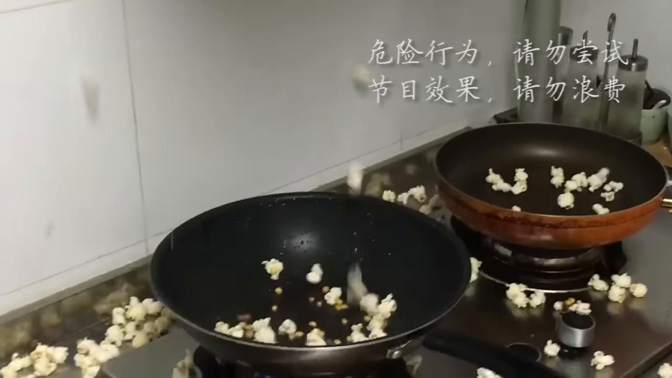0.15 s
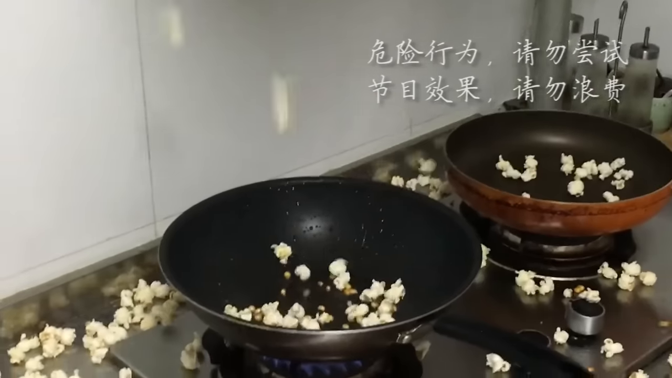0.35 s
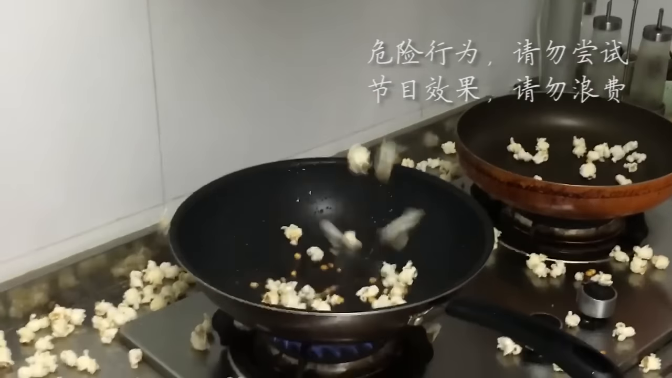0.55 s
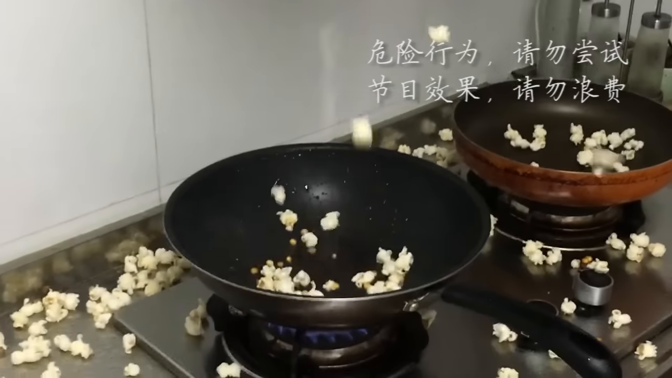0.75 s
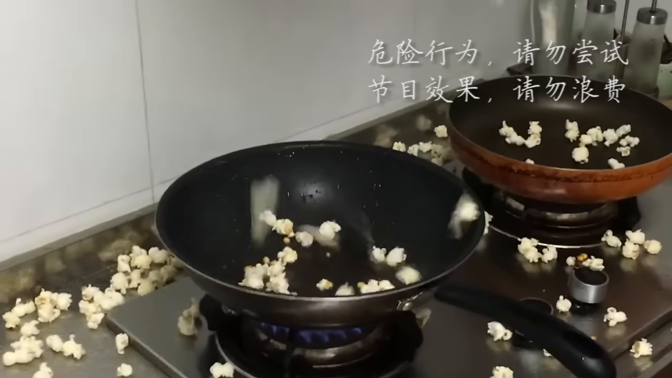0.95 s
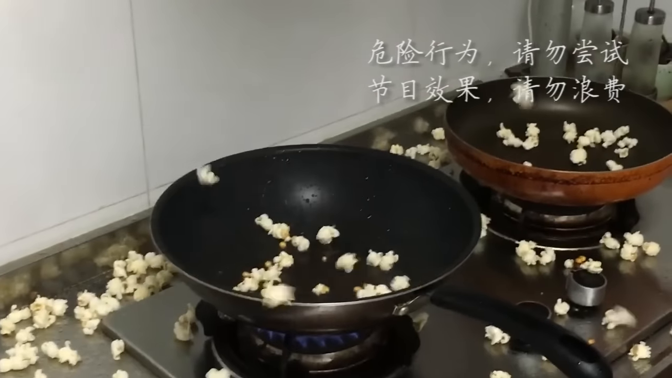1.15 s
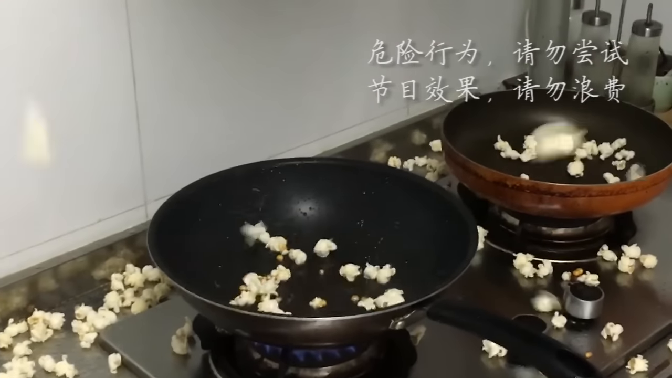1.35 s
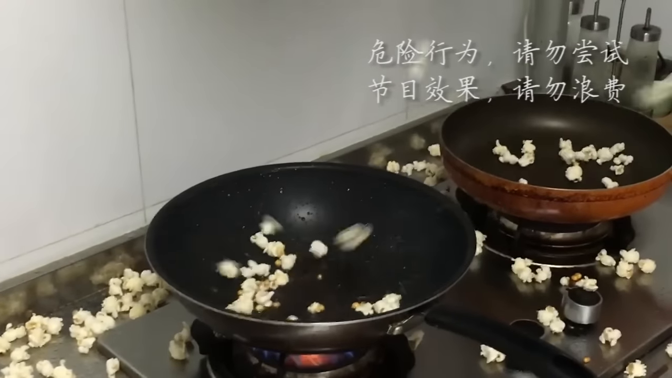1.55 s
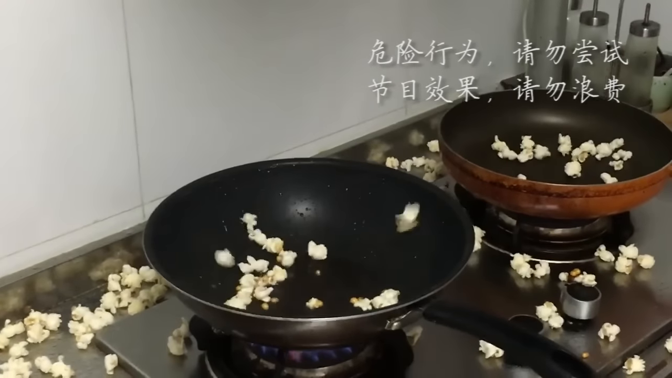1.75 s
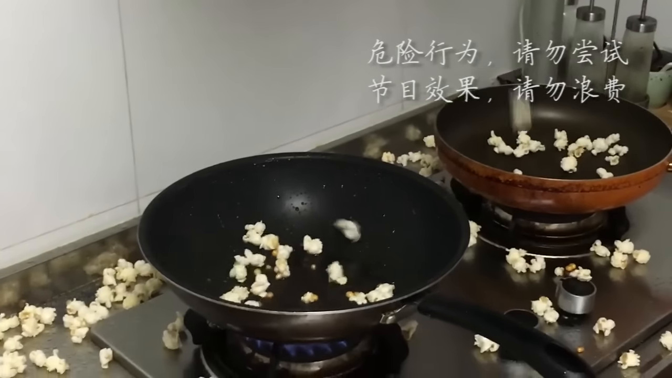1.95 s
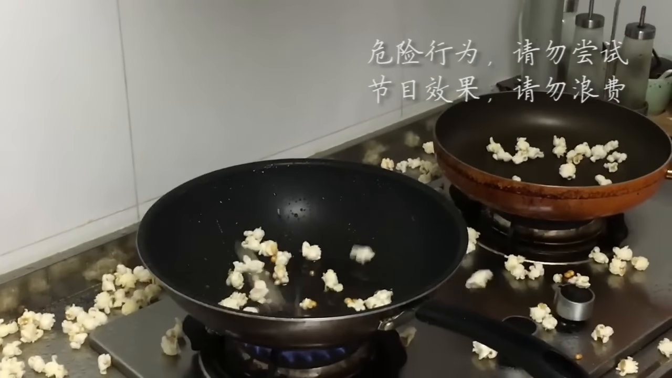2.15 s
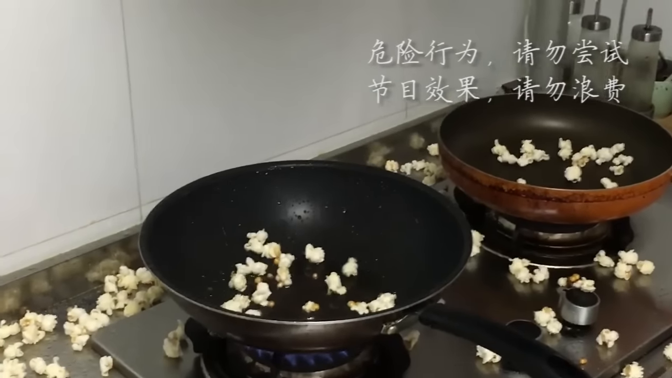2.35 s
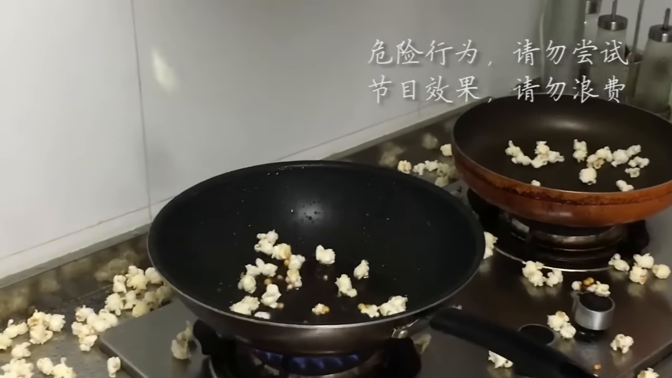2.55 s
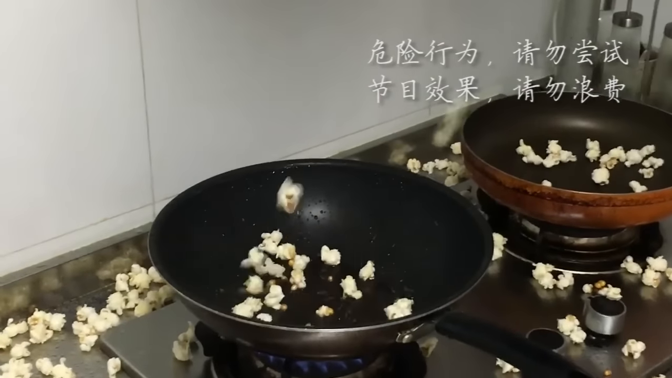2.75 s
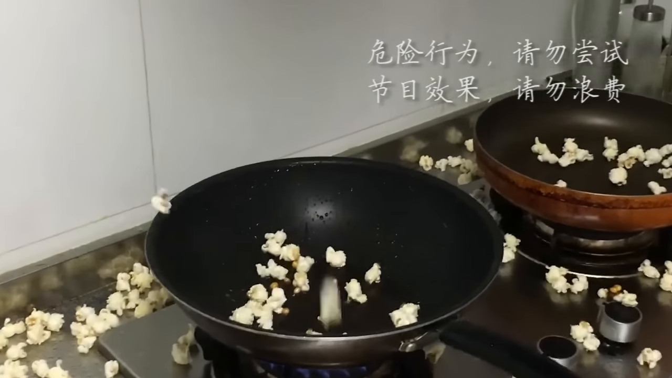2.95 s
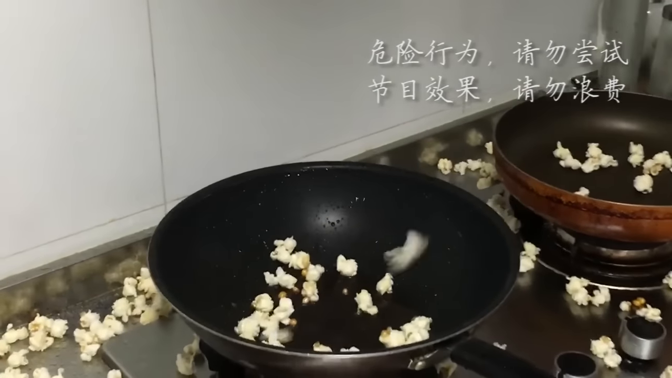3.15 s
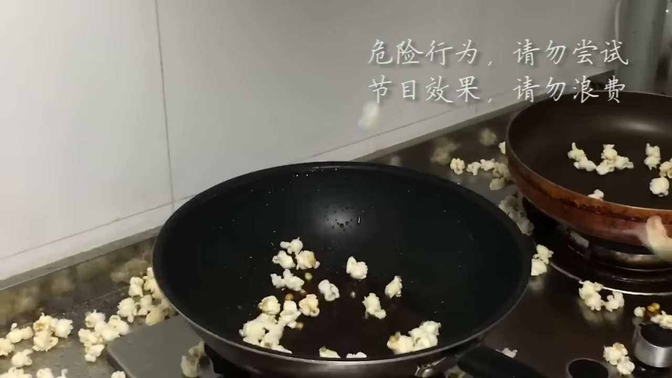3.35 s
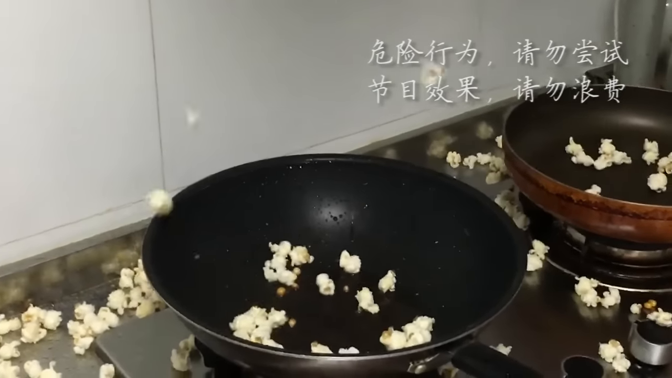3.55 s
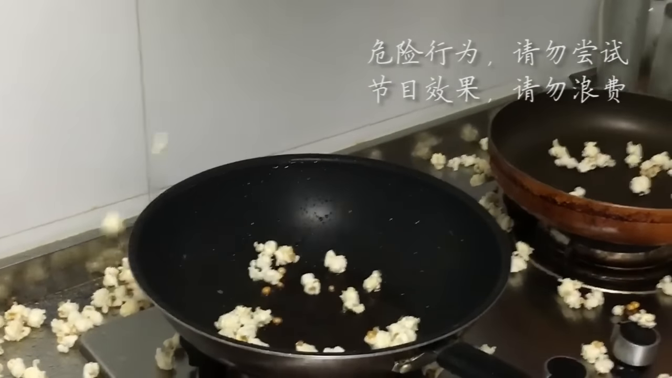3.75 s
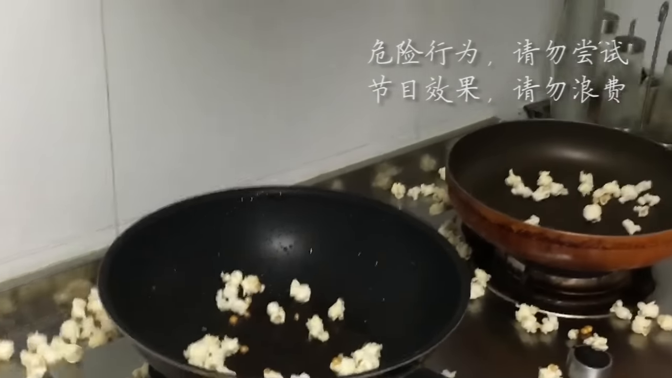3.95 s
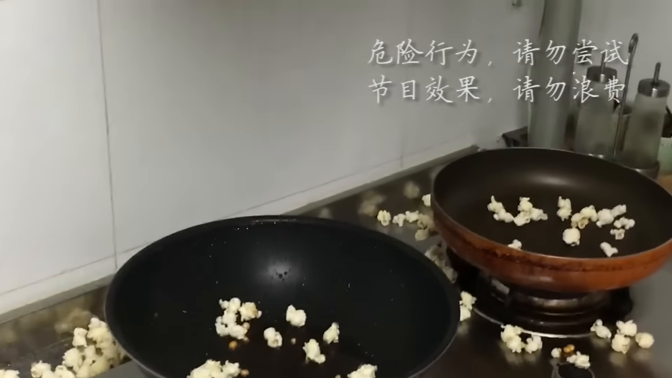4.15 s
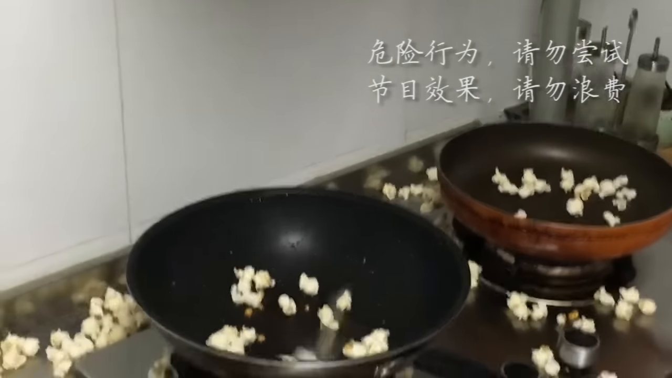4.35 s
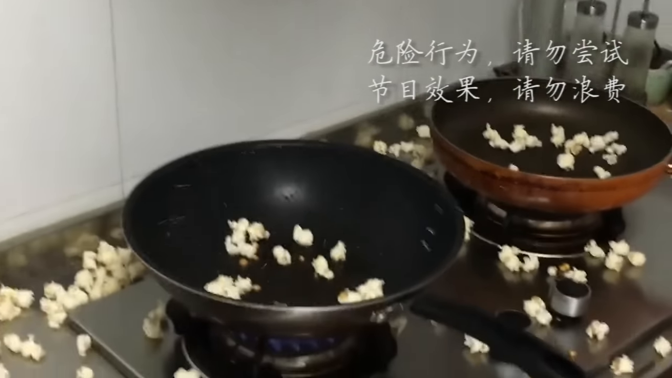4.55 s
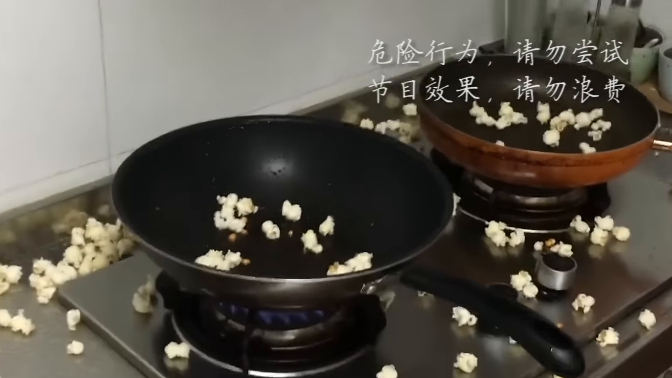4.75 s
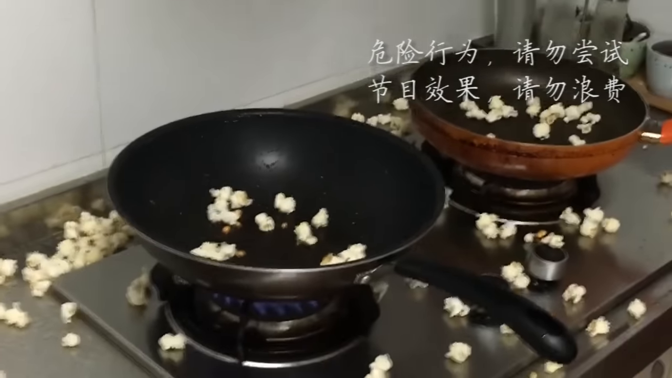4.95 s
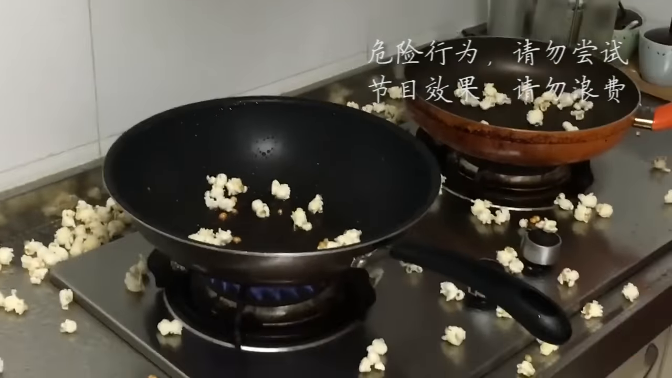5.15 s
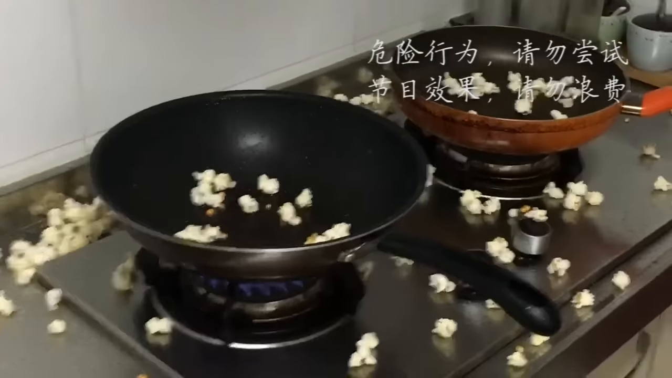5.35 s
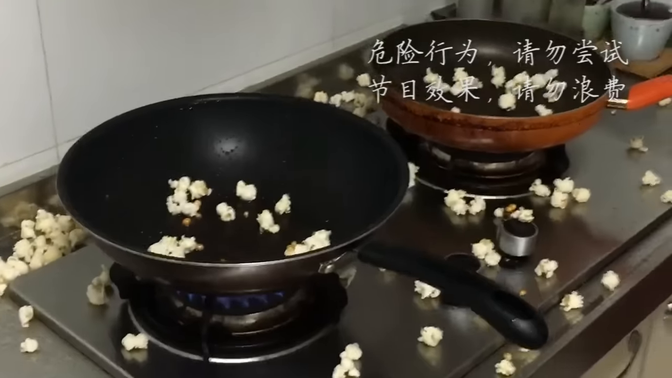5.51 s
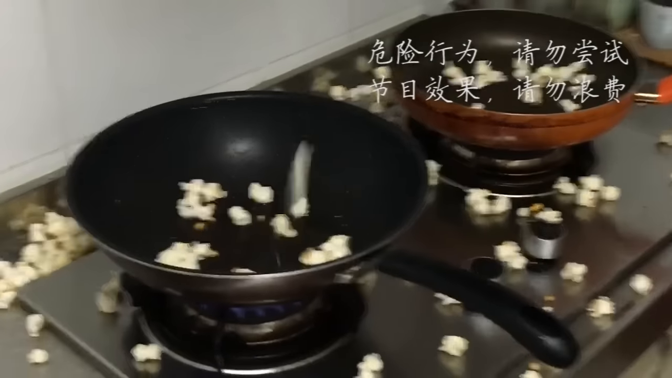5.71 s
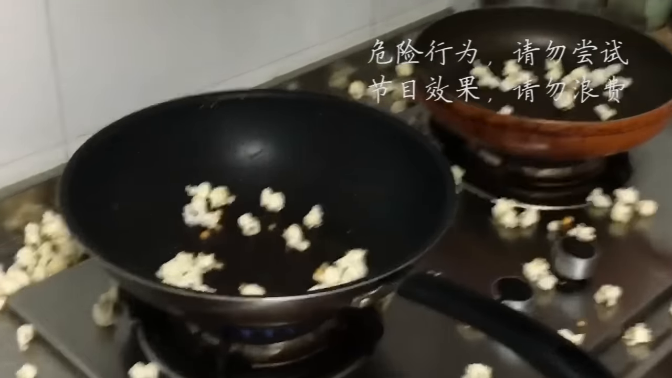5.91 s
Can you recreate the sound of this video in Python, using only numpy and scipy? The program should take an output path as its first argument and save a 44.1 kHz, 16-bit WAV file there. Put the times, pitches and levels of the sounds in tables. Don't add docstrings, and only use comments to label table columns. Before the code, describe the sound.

Popcorn kernels burst with sharp, ringing cracks in an open wok over a hissing gas flame, flakes thudding onto a steel stovetop in a kitchen.

```python
import sys
import numpy as np
from scipy import signal
from scipy.fft import rfft, irfft, next_fast_len
from scipy.io import wavfile
from scipy.ndimage import uniform_filter1d

SR = 44100
rng = np.random.default_rng(int(sys.argv[2]) if len(sys.argv) > 2 else 0)


def undo_db(level):
    steps = np.asarray(level, float) / 20
    return 10 ** steps


def bounce(signal):
    frames = np.transpose(np.atleast_2d(signal))
    limited = np.clip(frames, -1, 1)
    pcm = np.round(limited * 32767).astype(np.int16)
    wavfile.write(sys.argv[1], SR, pcm)


N = 268116
SPAN, SHORT = 20480, 2048
HZ = np.fft.rfftfreq(SPAN, 1 / SR)
HZ_SHORT = HZ[::SPAN // SHORT]

# frequency in Hz, level in dB per Hz.
FLAME_COLOUR = [(18, -37), (30, 2), (112, 2), (195, -7), (323, 1), (479, -6.5), (608, -3), (771, -8),
                (952, -1), (1660, -6), (5020, -14.5), (6200, -9.5), (7460, -14), (15200, -14.5),
                (16500, -40)]
# frequency in Hz, width in Hz, height in dB.
BURNER_WHISTLES = [(6280, 110, 10), (6090, 260, 7), (1050, 200, 1.5), (2300, 350, 4)]
# time in seconds, level in dB, rumble below 1 kHz in dB.
FLAME_LEVEL = [
    (0, -41, 4),
    (1.4, -37, 0.5),
    (2.0, -39, -0.5),
    (2.7, -40.5, 1),
    (3.8, -40.5, 0),
    (4.3, -42.5, -3.5),
    (4.9, -42.5, -3),
    (5.4, -44, -1),
    (6.08, -42, -4.5),
]
# frequency in Hz, width in Hz, height in dB.
MIC_PORT = [(10470, 620, -1)]

# frequency in Hz, time to fall 60 dB in seconds.
ROOM_DECAY = [(60, 0.43), (250, 0.39), (700, 0.45), (1800, 0.43), (4800, 0.41), (9000, 0.39), (14000, 0.27)]
# delay in milliseconds, level in dB.
ECHOES = [(0, 7.5), (1.6, 0), (4.8, 0.5), (7.5, -6.5)]

# start in seconds, level in dB, centre in Hz, sharpness.
THUDS = [(0.224, -14.5, 1720, 0.49), (0.344, -15.5, 1390, 0.52), (0.449, -19, 1810, 0.86),
         (1.279, -19.5, 930, 0.52), (2.147, -22, 1150, 0.73), (2.5637, -20.5, 1030, 0.6),
         (2.719, -33, 1104, 0.31), (3.3, -28, 1060, 2), (3.905, -18.5, 980, 1.1), (3.9065, -26, 252, 1.3),
         (4.047, -27, 1700, .5), (4.313, -27, 1110, .45), (4.372, -25, 2080, 0.56), (5.174, -31, 980, 2.2),
         (5.181, -39, 230, 1.2), (5.484, -25.5, 1880, 1.6)]
# start in seconds, level in dB, centre in Hz, sharpness.
SKIDS = [
    (0.471, -10.5, 1730, 0.3),
    (4.023, -19.5, 920, 0.53),
    (4.03, -24, 280, 0.91),
    (4.055, -23.5, 1050, 1.4),
    (5.416, -26.5, 2120, 2.6),
    (5.43, -23, 2590, 0.48),
    (5.475, -21, 2350, 0.34),
]
# start in seconds, level in dB, centre in Hz.
TICKS = [
    (0.45, -37, 3100),
    (2.255, -36, 8000),
    (4.229, -34, 6600),
    (4.047, -32, 6000),
    (4.374, -22, 12000),
    (4.3125, -35.5, 2500),
    (4.6, -40, 6410),
    (5.167, -28.5, 10400),
    (5.715, -43, 6170),
    (6.0732, -17, 12000),
]

# start in seconds, peak in dB.
AIR_PUFFS = [(0.483, -38), (0.567, -23), (0.892, -28), (1.003, -21), (1.417, -21.5), (1.659, -20),
             (1.951, -42), (2.345, -20), (2.801, -19.5), (3.612, -31), (3.906, -33), (4.55, -51),
             (5.864, -21)]
# start in seconds, peak in dB, length in milliseconds, gap to the bowl's copy in milliseconds, puff in dB.
SLAPS = [
    (3.0552, 6, .27, 1.6, -5),
    (3.3108, 4, .24, 1.1, -21),
]

# start in seconds, room level in dB, bass weight in dB, treble snap in dB, direct pulse over room in dB.
FLURRY = [(-0.012, 10, -25, -16.5, 12), (0.3126, -22, -37, -9.0, 7), (0.4848, -12, -18.5, -11, 8.5),
          (0.5675, 1.0, -27, -11.5, 10.5), (0.616, -1.5, -18, -15, 7.5), (0.6481, -2.5, -21, -16.5, -1.5),
          (0.7323, -6.5, -16.5, -14.0, 8.5), (0.893, -7, -17.5, -13.5, 8), (0.9613, -4.0, -13, -15, 6),
          (0.9875, -1.5, -21.0, -14.5, 8), (1.0031, -5, -9.5, -33, 7), (1.0901, -2, -19, -19.5, 6.0)]
# start in seconds, room level in dB, bass weight in dB, treble snap in dB, direct pulse over room in dB.
STRAGGLERS = [(1.4158, 2.5, -30.5, -17.0, 3), (1.658, -1, -28, -19, 8.5), (1.6861, 1, -29, -18.0, 8.8),
              (1.952, -5.5, -15, -14, 6.0), (2.345, -7, -17.5, -12, 7.3), (2.809, 1.0, -31.5, -17.5, 8.5),
              (2.8636, -8.0, -13.5, -17.0, 9.9), (3.054, -2.5, -27.5, -12.5, 9),
              (3.31, -7.0, -19, -10, 10.7), (3.4737, 4.5, -31.5, -14.5, 5.3), (3.613, -1.0, -25, -4.5, 5.3),
              (4.559, 1, -24.5, -14.5, 9.1), (5.8633, -8, -18.5, -12.5, 8.5),
              (6.0663, -16.5, -23, 2.5, 2.1)]
# frequency in Hz, level in dB per Hz.
BURST_COLOUR = [(24, -34), (40, -34), (112, -6), (233, -7.5), (271, -1.5), (484, -10.5), (608, -2),
                (672, -8), (909, -14), (1620, -14), (3920, -9.5), (4790, -12.5), (6170, -9.5), (14900, -5),
                (16500, -58)]
# frequency in Hz, width in Hz, height over the broad colour in dB.
BOWL_MODES = [(109.5, 5.4, 5.5), (204, 5, 12.5), (269.4, 8.1, 9), (303, 17, 4.5), (538, 6.4, 8.5),
              (604, 10.6, 10), (633, 22, 4), (797, 12, -4), (1104, 11.4, 9), (1510, 10, 1.5),
              (1658, 20, 5.5), (1886, 56, 2.5), (2320, 11, 6.5), (2340, 14, 6), (4020, 13, -2),
              (4200, 21, 3), (5890, 44, 5), (6530, 38, 2)]
# burst start in seconds, delay in milliseconds, share, second delay in milliseconds, ring in dB.
BOUNCES = [(-0.012, 0.19, 0.079, 0.46, 2.5), (0.485, 0.062, 0.14, 0.95, -8.5),
           (0.568, 0.6, 0.094, 1.34, -2.5), (0.616, 0.606, 0.45, 1.18, 2.5), (0.648, 0.333, 0.4, 0.59, 1.5),
           (0.732, 0.93, 0.46, 0.9, 2.5), (0.893, 0.46, 0.13, 0.83, 4), (1.09, 0.37, 0.093, 0.58, -3),
           (1.417, 0.39, 0.17, 0.97, 9), (1.658, 0.23, 0.31, 1.44, 4.5), (1.686, 0.15, 0.85, 0.53, 1),
           (1.952, 0.13, 0.22, 0.35, -3), (2.345, 0.96, 0.33, 0.58, 2.5), (2.809, 0.33, 0.067, 0.25, 3),
           (2.864, 0.21, 0.28, 0.68, -7), (3.054, 1.46, 0.2, 0.28, 0.5), (3.31, 0.91, 0.21, 0.87, -1),
           (3.474, 0.29, 0.28, 1.06, -0.5), (3.613, 0.66, 0.45, 0.88, 2.5), (4.559, 0.76, 0.45, 0.43, 3.5),
           (5.863, 0.61, 0.3, 1.1, -9), (6.066, 0.42, 0.55, 0.8, -3)]
# burst start in seconds, frequency in Hz, lift in dB.
HULL_NOTES = [(-0.012, 1180, 3.5), (0.313, 850, 5), (0.485, 960, 3), (0.568, 3310, 2.5), (0.648, 900, 5),
              (0.732, 1880, 8), (0.893, 850, 6.5), (1.003, 2250, 10), (1.09, 1600, 5.5), (1.416, 2830, 3.5),
              (1.686, 6530, 4), (1.952, 1400, 3), (2.345, 1890, 5), (2.809, 1880, 6.5), (2.864, 1450, 7.5),
              (3.054, 4770, 4), (3.31, 860, 1.5), (3.474, 5640, 3.5), (3.613, 5160, 6), (4.559, 1780, 2.5),
              (5.863, 3100, 5.5)]


def line(table, hz):
    t = np.array(table, float)
    return np.interp(np.log(hz + 1), np.log(t[:, 0]), t[:, 1])


def peaks(table, hz):
    power = 1
    for f, width_hz, db in table:
        power = power + (undo_db(db) ** 2 - 1) / (1 + (2 * (hz - f) / width_hz) ** 2)
    return np.sqrt(power)


def walk(rate):
    hold = int(SR / rate)
    steps = np.repeat(rng.standard_normal(N // hold + 1), hold)
    y = uniform_filter1d(uniform_filter1d(steps, hold), hold)[:N]
    return y / y.std()


def causal(gain):
    c = irfft(np.log(gain + 1e-6))
    half = len(c) // 2
    c[1:half] *= 2
    c[half + 1:] = 0
    return np.exp(rfft(c))


def add(out, s, y):
    i = int(s * SR)
    y = y[max(-i, 0):N - i]
    out[max(i, 0):max(i, 0) + len(y)] += y


def flame():
    size = next_fast_len(N, True)
    hz = np.fft.rfftfreq(size, 1 / SR)
    oil = rng.random(N) < 300 / SR
    oil = oil * undo_db(3.5 * rng.exponential(size=N)) * rng.standard_normal(N)
    gas = rfft(rng.standard_normal(N) + 0.49 * oil, size)
    gas *= undo_db(line(FLAME_COLOUR, np.minimum(hz, 15000)))
    gas *= peaks(BURNER_WHISTLES, hz) * peaks(MIC_PORT, hz)
    times, levels, rumbles = np.array(FLAME_LEVEL).T
    level_db = np.interp(np.arange(N) / SR, times, levels)
    rumble_db = np.interp(np.arange(N) / SR, times, rumbles)
    out, swell = 0, walk(1.5)
    centres = 30 * 2. ** np.arange(10)
    for k, centre in enumerate(centres):
        share = line([(f, j == k) for j, f in enumerate(centres)], hz)
        drift_db = .5 * swell + .9 * walk(9)
        out = out + irfft(gas * share, size)[:N] * undo_db(drift_db + rumble_db * (centre < 1000))
    return out / out.std() * undo_db(level_db)


def room_bands():
    t = np.arange(SPAN) / SR
    fade = np.minimum(1, 4 * (1 - t / t[-1]))
    bands = []
    for k, (_, t60) in enumerate(ROOM_DECAY):
        share = line([(f, j == k) for j, (f, _) in enumerate(ROOM_DECAY)], HZ)
        next_room = undo_db(-27.5) * 1000 ** (-t / t60 / 2.3)
        bands.append((share, fade * (1000 ** (-t / t60) + next_room)))
    return bands


def strike(bands, colour, direct_db, rise_ms, pulse_ms):
    ms = np.arange(SPAN) / SR * 1000
    short_ms = ms[:SHORT]
    tear = rfft(rng.standard_normal(SHORT) * short_ms * np.exp(-short_ms / 3.0))
    lumps = np.abs(1 + .36 * tear / np.sqrt(np.mean(np.abs(tear) ** 2)))
    colour = colour * np.interp(HZ, HZ_SHORT, lumps) ** np.clip(HZ / 1000, 0, 1)
    colour = colour / np.sqrt(np.mean(colour ** 2))
    diffuse = rfft(rng.standard_normal(SPAN)) * colour
    y = sum(irfft(diffuse * share) * decay for share, decay in bands)
    y *= 1 - np.exp(-(ms / rise_ms) ** 2)
    spatter = .5 * rng.standard_normal(SHORT) * np.exp(-short_ms / pulse_ms)
    crack = spatter + 1.97 * np.exp(-short_ms / 0.033)
    place = 1 + 0.1406 * rng.standard_normal(len(ECHOES))
    paths = 0
    for (lag_ms, db), shift in zip(ECHOES, place):
        paths = paths + undo_db(db) * np.exp(-2j * np.pi * HZ_SHORT * lag_ms * shift / 1000)
    onset = causal(colour[::SPAN // SHORT])
    y[:SHORT] += undo_db(direct_db) * irfft(rfft(crack) * onset * paths)
    return y


def landings(out, bands):
    ticks = [(*row, 0.37) for row in TICKS]
    steel = undo_db(.5 * line(BURST_COLOUR, np.minimum(HZ, 14800)))
    for rows, direct_db, rise_ms in ((THUDS, 1.5, 2.7), (SKIDS, -1, 10), (ticks, 9.5, 4)):
        for s, db, centre_hz, sharp in rows:
            detune = sharp * (HZ / centre_hz - centre_hz / (HZ + 1))
            hump = 1 / (1 + detune ** 2) ** 1.35 + undo_db(-34)
            y = strike(bands, hump * steel, direct_db, rise_ms, pulse_ms=1.0)
            add(out, s, undo_db(db - 11.5) * y)


def swing(t, hz, t60):
    return np.sin(2 * np.pi * hz * t) * 1000 ** (-t / t60)


def air_puffs(out):
    t = np.arange(8192) / SR
    starts = np.array([row[0] for row in FLURRY + STRAGGLERS + THUDS])
    for s, db in AIR_PUFFS:
        nearest = starts[np.argmin(np.abs(starts - s))]
        add(out, nearest, undo_db(db + 4) * swing(t, hz=112, t60=0.14))
    for s, db, ms, gap_ms, puff_db in SLAPS:
        u = t * 1000 / ms
        slap = undo_db(db) * 1.14 * u * (2 - u) * np.exp(-1.3 * u)
        add(out, s, slap + undo_db(puff_db) * swing(t, hz=85, t60=0.02))
        add(out, s + gap_ms / 1000, .9 * slap)


def bowl_copy(ms):
    return np.exp(-2j * np.pi * HZ * ms / 1000) / (1 + (HZ / 12000) ** 2)


def bursts(out, bands):
    body = undo_db(line(BURST_COLOUR, np.minimum(HZ, 14800))) * peaks(BOWL_MODES, HZ) * peaks(MIC_PORT, HZ)
    body /= np.sqrt(1 + (HZ / 14000) ** 8)
    for s, db, weight_db, snap_db, direct_db in FLURRY + STRAGGLERS:
        boom_db, ring_db, comb = weight_db + 9.5, .9 * weight_db + 11.5, 1
        for at, ms, share, second_ms, struck_db in BOUNCES:
            if abs(at - s) < .008:
                comb = np.abs(1 + min(share, .75) * bowl_copy(ms) + 0.21 * bowl_copy(second_ms))
                ring_db += struck_db
        note = [(hz, 94 + 0.062 * hz, lift_db) for at, hz, lift_db in HULL_NOTES if abs(at - s) < .008]
        tilt_db = line([(300, boom_db), (600, ring_db), (1000, 0.49 * (weight_db + 20)), (1500, 0),
                        (5000, 0.017), (10000, snap_db + 8.0), (14000, snap_db + 6.0)], HZ)
        colour = body * undo_db(tilt_db) * comb * peaks(note, HZ)
        y = strike(bands, colour, direct_db + 3, rise_ms=3.5, pulse_ms=.5)
        add(out, s + .0007, undo_db(db - 5.0) * y)


def scene():
    out, bands = flame(), room_bands()
    landings(out, bands)
    air_puffs(out)
    bursts(out, bands)
    return np.array([out, out])


def band_limit(x):
    return signal.sosfilt(signal.butter(12, 16620, fs=SR, output="sos"), x)


def record(dry):
    ring_band = signal.butter(1, [3050, 3350], "band", fs=SR, output="sos")
    ring = signal.sosfiltfilt(ring_band, dry)
    clipped = np.clip(dry - .25 * ring, -.88, .88)
    treble = signal.butter(4, 10500, "high", fs=SR, output="sos")
    grit = signal.sosfilt(treble, clipped[0] * rng.standard_normal(N))
    pair = clipped + undo_db(-27) * grit * np.array([[1], [-1]])
    pair = signal.sosfilt(signal.butter(2, 45, "high", fs=SR, output="sos"), pair)
    mix = signal.sosfilt(signal.ellip(12, .3, 60, 15740, fs=SR, output="sos"), pair)
    return band_limit(mix)


dry = scene()
out = record(dry)
bounce(out)
```